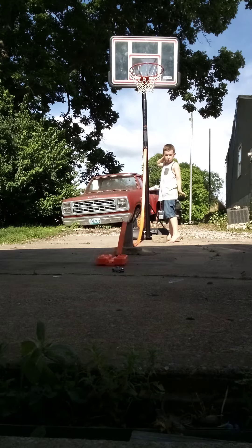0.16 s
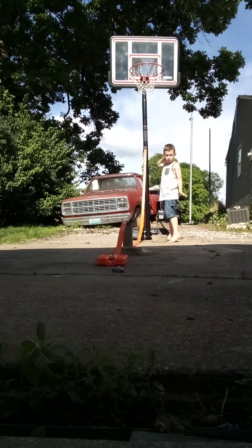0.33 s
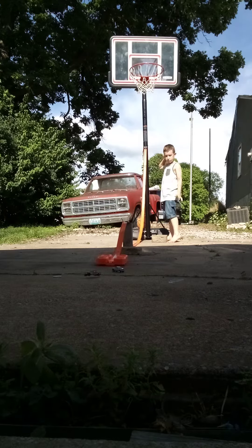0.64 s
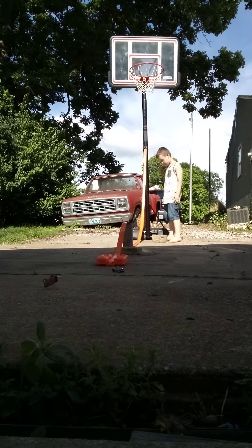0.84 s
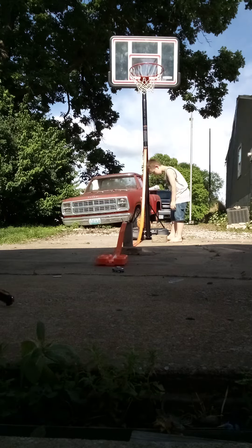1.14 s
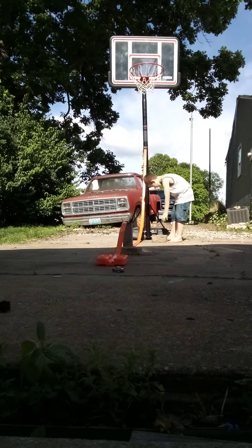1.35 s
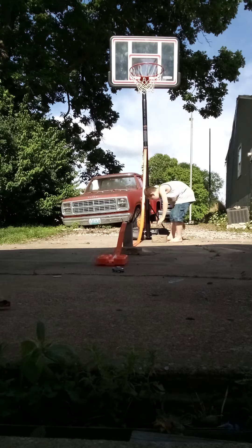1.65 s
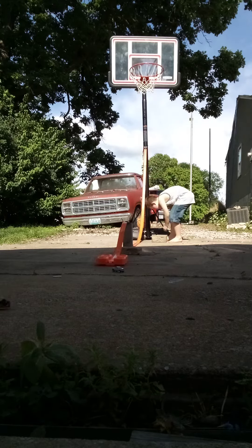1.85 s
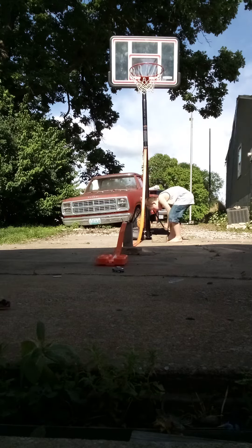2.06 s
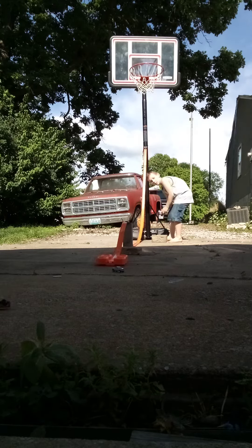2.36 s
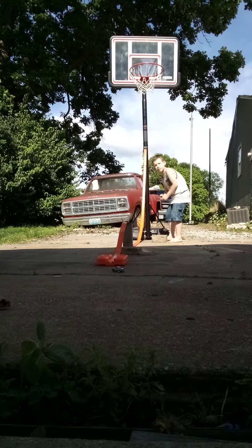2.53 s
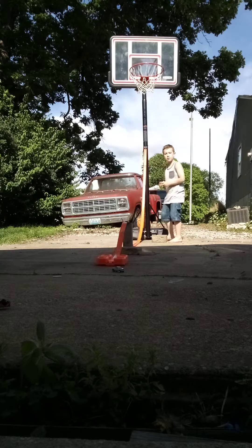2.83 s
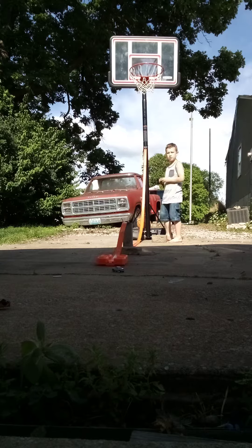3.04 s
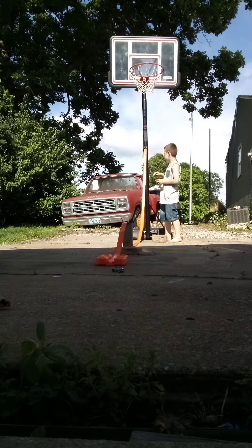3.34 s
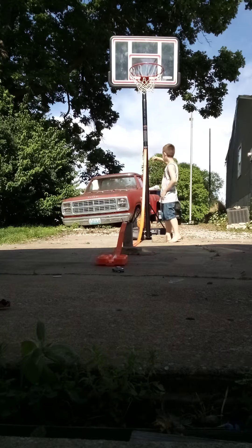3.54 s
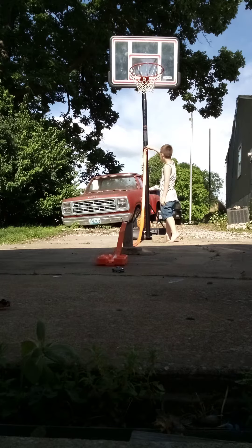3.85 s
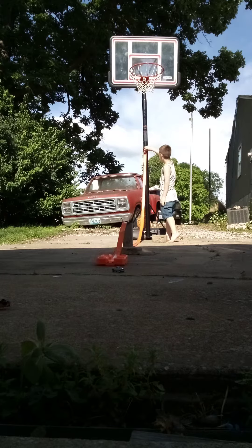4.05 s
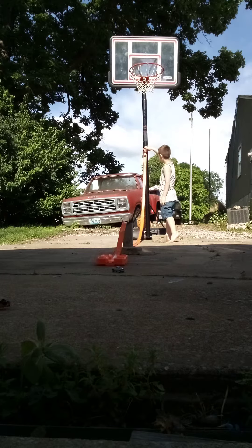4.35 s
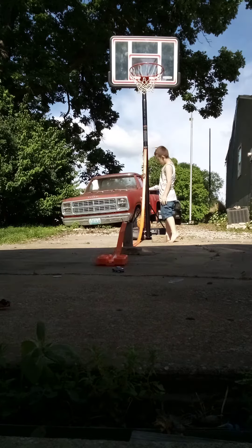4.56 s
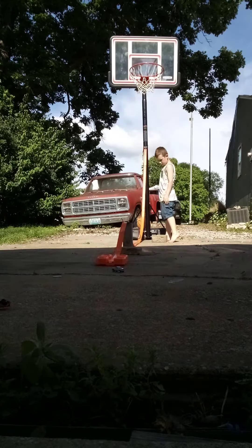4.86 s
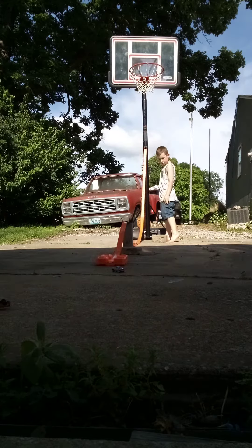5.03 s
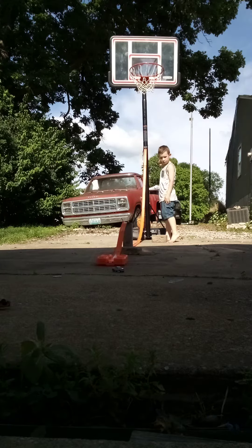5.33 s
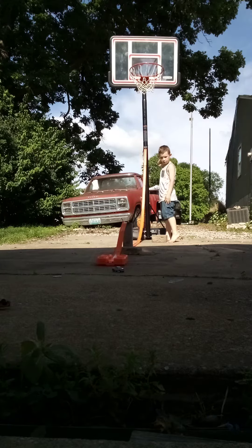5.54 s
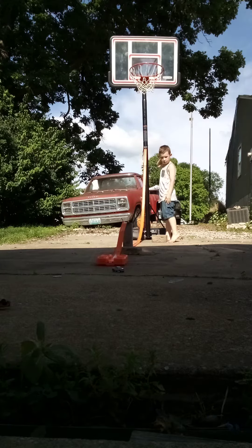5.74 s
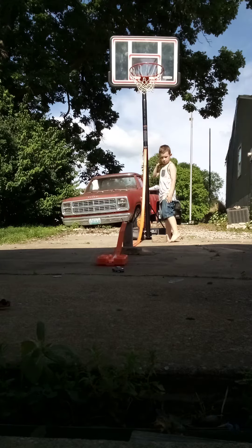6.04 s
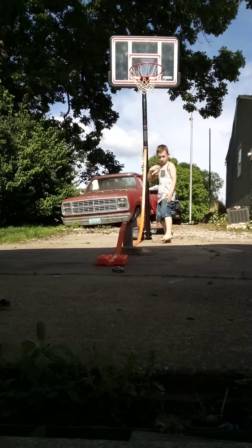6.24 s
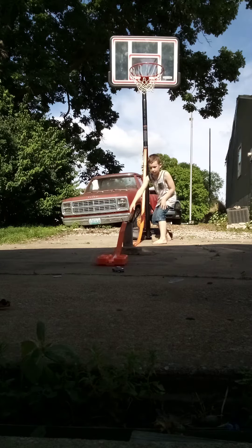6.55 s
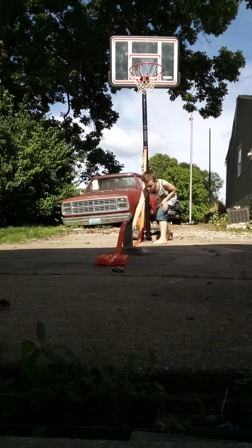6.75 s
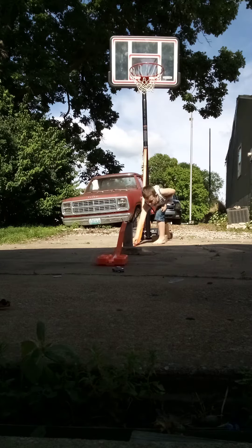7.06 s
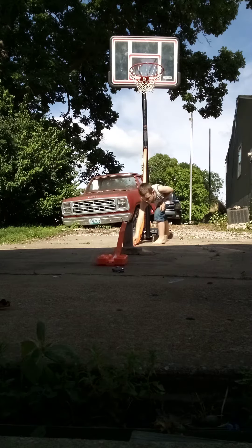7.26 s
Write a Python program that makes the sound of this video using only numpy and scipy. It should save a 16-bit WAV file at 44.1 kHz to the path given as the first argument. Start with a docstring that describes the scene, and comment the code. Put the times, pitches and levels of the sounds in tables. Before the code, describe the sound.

A small metal toy car rattles down a plastic track right at the start, its tiny wheels chattering with a hollow knock or two. From about 0.5 seconds it tumbles over concrete in quick, bright, slightly ringing clicks, loudest close to the microphone between 0.8 and 1.4 seconds, and settles by 1.9 seconds. Behind it a motor vehicle hums with an uneven exhaust beat, rising in pitch and shifting up just after 2 seconds. Its low drone grows, is strongest from about 4.5 to 6 seconds, and eases toward the end, a little after 7 seconds. From 4.5 to 5.5 seconds feet scuff over grit and kick small clicking stones, with another faint scuff near 6.3 seconds. Soft distant tyre noise and leaf hiss continue throughout. House walls give the near sounds short, light echoes in the open yard.

```python
"""A small metal toy car rattles down a plastic track, then tumbles over concrete near the microphone.
Its wheels chatter and each knock rings the die-cast shell. A vehicle with an uneven exhaust beat
pulls away, shifts up and drones past; tyre roar and leaves rush behind. Later, soles scuff on grit
and kick stones. House walls give the near sounds short echoes."""
import sys
import numpy as np
from scipy import signal
from scipy.fft import rfft, irfft
from scipy.io import wavfile
from scipy.ndimage import uniform_filter1d, map_coordinates

SR = 44100
rng = np.random.default_rng(int(sys.argv[2]) if len(sys.argv) > 2 else 0)


def transcribe(signal):
    """Save signal, clipped to [-1, 1], as a 16-bit WAV file at the path in sys.argv[1]."""
    frames = np.atleast_2d(signal).T
    limited = np.clip(frames, -1, 1)
    pcm = np.round(limited * 32767).astype(np.int16)
    wavfile.write(sys.argv[1], SR, pcm)


N = 325943
TIME_S = np.arange(N) / SR


def amp(db):
    """Gain of a level in dB."""
    return 10 ** (np.asarray(db) / 20)


def unit(x):
    """x at rms 1."""
    return x / np.sqrt(np.mean(x ** 2) + 1e-20)


def curves(rows):
    """One value per sample for each column after the time."""
    times_s, *columns = np.transpose(rows)
    return [np.interp(TIME_S, times_s, column) for column in columns]


def wobble(rate_hz):
    """Smooth random curve through rate_hz knots a second."""
    return map_coordinates(rng.standard_normal(int(N * rate_hz / SR) + 4), [TIME_S * rate_hz])


def coloured(x, spectrum):
    """x through a minimum-phase filter given as (Hz, dB) points."""
    points_hz, points_db = np.transpose(spectrum)
    bins_hz = np.fft.rfftfreq(16384, 1 / SR)
    gain = amp(np.interp(np.log(bins_hz + 1), np.log(points_hz), points_db))
    cepstrum = irfft(np.log(gain + 1e-7))
    cepstrum[1:8192] *= 2  # fold onto the causal half
    cepstrum[8193:] = 0
    return signal.fftconvolve(x, irfft(np.exp(rfft(cepstrum))))[:len(x)]


def rush(spectrum, patchy_db=2.5, drift_db=0, tick_gain=0):
    """Coloured noise of rms 1 with quick patches and slow drifts of gain, plus optional dense ticks."""
    stft = signal.stft(rng.standard_normal(N), nperseg=512)[2]

    def gain_field(bins, frames):
        across_bins = uniform_filter1d(rng.standard_normal(stft.shape), bins, axis=0)
        return unit(uniform_filter1d(across_bins, frames, axis=1))

    gain_db = drift_db * gain_field(4, 50) + patchy_db * gain_field(3, 8)
    noise = signal.istft(stft * amp(gain_db), nperseg=512)[1][:N]
    ticks = (rng.random(N) < 400 / SR) * rng.uniform(-1, 1, N)
    return unit(coloured(unit(noise) + tick_gain * unit(ticks), spectrum))


# Each row: frequency in Hz, gain in dB.
MIC_RESPONSE = [(500, -0.5), (4000, -4), (4800, -8.5), (5500, -37), (6500, -27), (8000, -41.5),
                (12000, -93.5)]

def microphone(x):
    """A small microphone dulls the treble."""
    return coloured(x, MIC_RESPONSE)


def rattle(per_s, centre_hz, octaves, t60_cycles):
    """Scattered tiny contacts, each ringing briefly at its own pitch."""
    t = np.arange(SR // 100) / SR
    when, pitch, strength = rng.random((round(per_s * N / SR), 3)).T[:, :, None]
    hz = centre_hz * 2 ** (octaves * (pitch - 0.5))
    envelope = amp(-60 * t * hz / t60_cycles) * (1 - np.exp(-t * hz))
    pings = -np.log(strength + 1e-3) * envelope * np.sin(2 * np.pi * hz * t)
    at = (when * N).astype(int) + np.arange(len(t))
    return microphone(unit(np.bincount(at.ravel(), pings.ravel(), N)[:N]))


# Each row: centre in seconds, exhaust order, depth in dB, seconds from centre to half depth.
ORDER_DIPS = [(0.318, 5, 19, 0.026), (0.503, 5, 8, 0.051), (0.82, 5, 16, 0.061), (2.308, 8, 17, 0.03),
              (2.48, 8, 22, 0.065), (2.737, 8, 25, 0.053), (2.92, 8, 15, 0.044), (4.716, 5, 8.5, 0.078),
              (4.843, 8, 10.5, 0.086), (4.978, 8, 5, 0.044), (5.2, 8, 24, 0.029), (5.311, 8, 11, 0.028),
              (5.348, 5, 9, 0.094), (5.676, 5, 6, 0.051), (5.684, 8, 29, 0.039), (5.863, 8, 4.5, 0.042),
              (5.955, 5, 11, 0.057), (6.061, 8, 17, 0.033), (6.208, 8, 9, 0.047), (6.255, 5, 10, 0.056),
              (6.526, 5, 10.5, 0.053), (6.63, 8, 23, 0.043), (7.01, 5, 2, 0.08), (7.075, 8, 5, 0.06),
              (7.237, 5, 17, 0.024)]

def dip_gain(order):
    """One exhaust order dips briefly in level."""
    return amp(-sum(depth_db * np.clip(1 - abs(TIME_S - centre_s) / (2 * half_s), 0, 1)
                    for centre_s, dipped, depth_db, half_s in ORDER_DIPS if dipped == order))


# Upshift just after 2 s. Each row: time in seconds, engine cycle rate in Hz.
ENGINE_SPEED = [(0.0, 19.2), (0.2, 20.0), (0.37, 20.9), (0.57, 21.6), (1.01, 22.3), (1.23, 23.3),
                (2.07, 25.5), (2.24, 22.0), (2.39, 21.5), (2.6, 21.3), (3.2, 21.4), (4.0, 22.2),
                (4.63, 22.4), (5.35, 23.2), (6.15, 23.1), (6.34, 22.5), (7.39, 22.4)]
# Nearness of the vehicle. Each row: time in seconds, exhaust noise level in dB.
NEARNESS = [(0.0, -58.5), (0.4, -53), (1.2, -50.5), (1.7, -52), (2.5, -46.5), (2.9, -45), (3.75, -43.5),
            (4.7, -39.5), (5.3, -43), (5.8, -43), (6.35, -42), (7.0, -42.5), (7.39, -49.5)]
# Each row: time in seconds, levels of orders 4, 5, 8 and 13 in dB.
STRONG_ORDERS = [(0.0, -67, -42, -56, -64), (0.45, -55.5, -48.5, -62.5, -83), (0.9, -51.5, -44, -55.5, -69),
                 (1.3, -45.5, -40.5, -53, -67), (1.65, -53, -43, -55.5, -66.5),
                 (2.0, -55, -49, -52.5, -67.5), (2.25, -51.5, -38, -52.5, -58.5),
                 (2.6, -59, -35.5, -47.5, -51.5), (3.0, -61, -38, -55.5, -56),
                 (3.4, -62, -37.5, -46, -51.5), (4.0, -55.5, -36.5, -37, -56),
                 (4.45, -65.5, -31.5, -33, -56), (4.75, -58.5, -35.5, -37, -45),
                 (5.1, -56.5, -31, -42, -47.5), (5.5, -56.5, -29.5, -37.5, -65),
                 (5.8, -45.5, -29, -36, -60), (6.1, -52, -31.5, -36.5, -62), (6.4, -54, -36.5, -43, -58),
                 (6.9, -59.5, -38, -41.5, -63), (7.39, -64, -38.5, -42.5, -74)]
# Each row: order, relative level in dB.
WEAK_ORDERS = [(2, -9), (3, -9), (6, -7), (7, -10), (9, -4), (10, -5), (11, -11), (12, -12), (14, -11),
               (16, -10), (18, -9), (19, -12), (20, -10)]
# Each row: frequency in Hz, relative level in dB.
EXHAUST_NOISE_SPECTRUM = [(40, -51), (70, -19), (100, 0.5), (160, -2.5), (250, -5), (330, -8), (420, -18.5),
                          (600, -78)]

def engine():
    """Uneven firing puts tones on multiples of the cycle rate; a few boom in the pipe."""
    (cycle_hz,), (near_db,) = curves(ENGINE_SPEED), curves(NEARNESS)
    fourth_db, fifth_db, eighth_db, thirteenth_db = curves(STRONG_ORDERS)
    phase = 2 * np.pi * np.cumsum(cycle_hz) / SR
    tones = amp(fifth_db + wobble(7)) * dip_gain(5) * np.sin(5 * phase + 0.15 * wobble(12))
    tones += amp(eighth_db + 1.5 * wobble(7)) * dip_gain(8) * np.sin(8 * phase + 0.2 * wobble(12))
    tones += amp(fourth_db) * np.sin(4 * phase + 0.3 * wobble(8))
    tones += amp(thirteenth_db) * np.sin(13 * phase + 1.1 * wobble(12))
    approach_db = near_db + 45
    low_db, high_db = -55.5 + 0.83 * approach_db, -58 + 2.2 * approach_db
    for order, relative_db in WEAK_ORDERS:  # street reflections fade each on its own
        level_db = (low_db if order <= 10 else high_db) + relative_db + 2.5 * wobble(2.5)
        tones += amp(level_db) * np.sin(order * phase + 0.65 * wobble(12) + rng.uniform(0, 2 * np.pi))
    return np.sqrt(2) * tones + amp(near_db) * rush(EXHAUST_NOISE_SPECTRUM)


# Each row: time in seconds, levels of rumble, tyre roar, leaf hiss and body drone in dB.
STREET_LEVELS = [(0.0, -55, -54.5, -60.5, -73), (0.4, -69, -51.5, -76, -64), (0.85, -57, -55, -55.5, -64),
                 (1.25, -57, -53.5, -60.5, -64.5), (1.6, -57.5, -50.5, -59, -74.5),
                 (1.9, -58.5, -54.5, -58, -78), (2.3, -56, -54, -64, -71), (2.7, -60.5, -54, -64.5, -65),
                 (3.3, -66, -53.5, -59.5, -66), (3.8, -64, -53.5, -57, -57),
                 (4.8, -58.5, -48.5, -54.5, -51), (5.15, -50.5, -51.5, -55.5, -53),
                 (5.55, -43.5, -48.5, -57, -58), (6.1, -55, -49.5, -55, -50),
                 (6.6, -65.5, -48.5, -53.5, -56), (7.15, -59.5, -48.5, -59.5, -61.5),
                 (7.24, -48.5, -49, -60.5, -58.5)]
# Each row: frequency in Hz, relative level in dB.
TYRE_SPECTRUM = [(300, -39.5), (450, -11.5), (620, -1), (800, 4.5), (1000, -0.5), (1300, -4), (1800, -12.5),
                 (2200, -28), (2900, -43.5), (4800, -120)]
LEAF_SPECTRUM = [(760, -26), (1300, -4), (1390, -9.5), (1930, -8), (2370, -8), (2760, -8), (3480, -13.5),
                 (3810, -18.5), (4310, -30.5), (5600, -50.5), (7280, -94.5), (12300, -120)]

def street():
    """Low rumble, far tyre roar, leaf hiss and a body drone that grows as the vehicle nears."""
    rumble_db, tyre_db, leaf_db, drone_db = curves(STREET_LEVELS)
    rumble = rush([(20, -1), (30, -2.5), (42, -5.5), (65, 19), (90, 1), (140, -70.5)], patchy_db=0.5)
    drone = rush([(250, -46.5), (360, 8), (450, 5), (600, 4), (800, -55)])
    tyres = rush(TYRE_SPECTRUM, patchy_db=1.6)
    leaves = rush(LEAF_SPECTRUM, drift_db=1.4)
    return amp(rumble_db) * rumble + amp(drone_db) * drone + amp(tyre_db) * tyres + amp(leaf_db) * leaves


# Each row: frequency in Hz, level in dB, t60 in seconds.
SHELL_MODES = [(1700, -20.5, .045), (2340, -7.5, 0.044), (2900, -12.5, 0.06), (3236, 6.5, 0.044),
               (3280, -10.5, 0.2), (3860, -13.5, .035), (4300, -13, .035)]

def shell_ring(t, bright_hz):
    """The die-cast shell rings; a blow favours the modes nearest its brightest pitch."""
    ring = np.zeros(len(t))
    for hz, mode_db, t60_s in SHELL_MODES:
        level_db = mode_db + rng.normal(0, 2.5) - 34 * abs(np.log2(hz / bright_hz))
        ring += amp(level_db - 60 * t / t60_s) * np.sin(2 * np.pi * hz * t)
    return ring


# Crack, skid on concrete and top edge of a hard contact. Each row: frequency in Hz, gain in dB.
CRACK_SPECTRUM = [(590, -56.5), (1000, -31.5), (1430, -19.5), (2160, -14.5), (2700, -7.5), (3230, -2.5),
                  (3540, -14), (3820, -1), (4490, -9.5), (5400, -32), (7020, -61.5), (11900, -120)]
SKID_SPECTRUM = [(500, -43), (1000, -25.5), (1600, -21.5), (2300, -6.5), (3200, -3), (4200, -10),
                 (5000, -20), (5600, -39), (6500, -34.5), (8000, -68.5), (12000, -120)]
EDGE_SPECTRUM = [(4000, -52), (5200, -2.5), (6000, 5), (6600, 5), (7300, -5.5), (8000, -22), (10000, -65)]

def impacts(rows):
    """Each contact gives a blow, ring, thud, crack, skid and top edge; long contacts are soft."""
    tones, cracks, skids, edges = np.zeros((4, N + SR))
    t = np.arange(SR // 8) / SR
    next_starts_s = [row[0] for row in rows[1:]] + [N / SR]
    for row, next_s in zip(rows, next_starts_s):
        start_s, level_db, bright_hz, ring_db, thud_db, contact_ms, crack_db, skid_db, edge_db = row
        contact_s = contact_ms / 1000
        onset = amp(level_db) * (1 - np.exp(-(1.87 * t / contact_s) ** 2))
        pulse = amp(level_db) * np.exp(-((t - contact_s) / (0.48 * contact_s)) ** 2)
        blow = pulse * np.sin(2 * np.pi * bright_hz * t)
        damping = amp(-60 * np.maximum(start_s + t - next_s, 0) / 0.015)  # by the next contact
        ring = amp(ring_db) * shell_ring(t, bright_hz) * damping
        thud_hz = 1290 / np.sqrt(contact_ms)
        thud = 1.1 * amp(thud_db - 60 * t / 0.011) * np.sin(2 * np.pi * thud_hz * t)
        noise = rng.standard_normal((3, len(t)))
        cutoff_hz = 5000 * 2 ** ((edge_db + 45) / 27.5)  # harder edge, brighter crack and skid
        crack_noise, skid_noise = signal.lfilter(*signal.butter(3, cutoff_hz, fs=SR), noise[:2])
        at = round(start_s * SR) + np.arange(len(t))
        tones[at] += blow + onset * (ring + thud)
        cracks[at] += onset * amp(crack_db - 60 * t / (9 * contact_s)) * crack_noise
        skids[at] += onset * amp(skid_db - 60 * t / 0.066) * skid_noise
        edges[at] += onset * amp(edge_db - 60 * t / (0.005 + 5 * contact_s)) * noise[2]
    gritty_skids = skids[:N] * amp(3.75 * wobble(300))
    return (microphone(tones[:N])
            + amp(13) * coloured(cracks[:N], CRACK_SPECTRUM)
            + amp(13.5) * coloured(gritty_skids, SKID_SPECTRUM)
            + amp(15.5) * coloured(edges[:N], EDGE_SPECTRUM))


# Each row: start in seconds, level in dB, brightest pitch in Hz, ring and thud in relative dB,
# contact time in ms, crack, skid and top edge in relative dB.
CAR_KNOCKS = [(0.0908, -44, 3030, -14, -9, 3, 11.5, -14, -33),
              (0.126, -46, 2860, -14, -14, 1.3, 1, -18, -34),
              (0.165, -42, 3330, -15, -13, 1.6, 1, -15, -26.5), (0.172, -33, 3400, -14, -9, 1, -5, -9, -34),
              (0.2372, -33, 2780, -17, -22, 1.3, -8, -19, -30.5),
              (0.3155, -38, 2630, -10, 3, 1.9, 3, -19, -54),
              (0.342, -26.5, 3370, -12, -5, 0.98, -7, -9.5, -44),
              (0.377, -26, 2550, -12, -17, 4.3, -16, -16, -58),
              (0.4024, -29, 2550, -12, -10, 1.6, -5, -18, -48),
              (0.4607, -36, 2700, -11, -16, 3, -10, -8, -48),
              (0.5405, -19.5, 4610, -19, -28, 1.7, -5, -11.5, -30.5),
              (0.549, -27, 3280, -8, -25, 2.7, -12, -25, -38),
              (0.5649, -33, 3300, -17, -19, 0.66, 2, -11, -33),
              (0.5845, -29.5, 3080, -5.5, -31, 2.4, 2, -13, -35),
              (0.634, -29, 3340, -13, -29, 2.3, -3, -7, -29.5),
              (0.681, -42.5, 3300, -17, -21, 1.9, 7, -9, -30),
              (0.684, -26, 3440, -14, -23, 1.8, -9, -9, -39), (0.692, -29, 3100, -9, -22, 1.6, 3, -15, -38),
              (0.6988, -35.5, 3400, -10, -15, 1.9, -6, 0.5, -31),
              (0.7593, -22.5, 3280, -12.5, -3, 2.15, 3, -23, -38.5),
              (0.7915, -29, 3330, -12.5, -36, 2.7, 1.5, -13, -34.5),
              (0.8526, -16, 3225, -27, -23, 2.2, -4, -25, -34),
              (0.8914, -31, 3180, -10, -18, 2.8, -15, 0.5, -25),
              (0.9855, -12.5, 3060, -1.5, -14, 1.26, -8.5, -21, -37.5),
              (1.04, -24.5, 3500, -20.5, -10, 1.7, 4.5, -12.5, -34.5),
              (1.046, -29.5, 3280, -16.5, -14, 1.2, 1, -9, -37.5),
              (1.0775, -23, 3170, -26.5, -34, 2.6, 2.5, -17.5, -35),
              (1.0835, -31, 3160, -21, -21.5, 2, -8, -13.5, -40),
              (1.1844, -15.5, 3170, -7, -32, 1.4, 0.5, -23, -39),
              (1.1972, -12.5, 3180, -30, -9.5, 1.48, -2.5, -19, -42),
              (1.281, -17.5, 3070, -14, -32, 2, -14, -16, -52.5),
              (1.3185, -27, 3160, -25, -19, 1.7, -10, -12, -42),
              (1.3417, -26.5, 2850, -5, -2.5, 1.5, -4, -5.5, -37),
              (1.351, -24.5, 2740, -19, -13, 1.3, -7, -16.5, -45),
              (1.372, -16, 3200, -10.5, -28.5, 2, 1.5, -26.5, -42.5),
              (1.3844, -33, 3250, -15, -14.5, 1.2, -3.5, -11, -38.5),
              (1.4157, -23, 3150, -8.5, -21.5, 4.4, -5, -5.5, -47),
              (1.4304, -28.5, 3150, -24, 3, 2.8, -4, -7, -51.5),
              (1.4674, -39.5, 3160, -14, -5, 3, 4.5, -2.5, -40),
              (1.577, -35.5, 3180, -10.5, -8, 2.1, -4, -21, -57),
              (1.5905, -40, 3150, -6, -9, 2.1, 2, -4, -58), (1.6017, -37.5, 2850, -15, -8, 2, -2, -11, -60),
              (1.7035, -36, 3250, -14.5, -28, 2, 0, -10, -41),
              (1.7161, -31, 3560, -19, -7, 1.7, -13, -12, -40),
              (1.737, -42, 2361, -11, -3, 1.2, 0, -14, -42),
              (1.845, -56, 4000, -24, -10.5, 3.7, 5, -3, -38)]

def car_knocks():
    """The toy car strikes the track, then the concrete."""
    return impacts(CAR_KNOCKS)


# Each row: start in seconds, end in seconds, level in dB, slope in dB per second.
WHEEL_RUNS = [(0.106, 0.345, -46.5, -6), (0.333, 0.458, -39.5, -16.5), (0.46, 0.54, -46, -79.5)]
# Each row: frequency in Hz, relative level in dB.
WHEEL_SPECTRUM = [(590, -24), (1000, -20), (1140, -19), (1280, -1), (1390, -16), (1680, -4), (2190, -2.5),
                  (2510, 0), (3350, 2.5), (3950, -8.5), (5200, -22), (5800, -31), (6600, -35), (7980, -77),
                  (10400, -96.5), (17600, -120)]
# Each row: frequency in Hz, bandwidth in Hz, relative level in dB.
TRACK_MODES = [(860, 100, -3), (1665, 57, 1), (1776, 76, 2), (2050, 34, -8.5), (2570, 120, 1),
               (2750, 43, -1), (3280, 98, -8), (3780, 53, 0)]

def wheels(ramp_s=0.013):
    """Tiny wheels chatter along the track and jolt its hollow resonances."""
    envelope = np.zeros(N)
    for start_s, end_s, level_db, db_per_s in WHEEL_RUNS:
        age_s = TIME_S - start_s
        gate = np.clip(np.minimum(age_s, end_s + ramp_s - TIME_S) / ramp_s, 0, 1)
        envelope += gate * amp(level_db + db_per_s * np.clip(age_s, 0, end_s - start_s))
    jolts = rush([(300, 6), (3900, -4), (5500, -32), (9000, -78)], tick_gain=0.78)
    hollow = sum(amp(db) * unit(signal.lfilter(*signal.iirpeak(hz, hz / width_hz, SR), jolts))
                 for hz, width_hz, db in TRACK_MODES)
    flutter = amp(-4.5 + 2.3 * wobble(109.7))
    rolling = rush(WHEEL_SPECTRUM, tick_gain=0.57) + amp(-3) * unit(hollow)
    chatter = amp(-6) * rattle(per_s=450, centre_hz=2800, octaves=1.1, t60_cycles=30)
    return envelope * (flutter * rolling + chatter)


# Each row: start in seconds, level in dB, pitch in Hz.
HOLLOW_THUMPS = [(.316, -26.5, 880), (.49, -40, 432), (.759, -48, 820), (.893, -48, 394),
                 (1.342, -39.5, 480)]

def thumps(rise_s=0.0038, t60_cycles=31):
    """A soft push from the car rings a hollow in the track or ground."""
    out, t = np.zeros(N + SR), np.arange(SR // 8) / SR
    for start_s, level_db, hz in HOLLOW_THUMPS:
        envelope = amp(level_db - 60 * t * hz / t60_cycles) * (1 - np.exp(-t / rise_s))
        out[round(start_s * SR):][:len(t)] += envelope * np.sin(2 * np.pi * hz * t)
    return out[:N]


# Each row: start in seconds, level in dB, rise in seconds, t60 in seconds.
SOLE_DRAGS = [(4.5, -59, 0.2, 0.61), (4.695, -55, .055, 1.1), (4.838, -56, 0.0076, 0.61),
              (4.955, -62, .012, 1.5), (5.15, -64, 0.15, 1.05), (5.38, -63.5, 0.11, 0.12),
              (6.2, -63.5, 0.039, 0.79), (6.302, -63, 0.0068, 0.23)]
# Each row: frequency in Hz, relative level in dB.
GRIT_SPECTRUM = [(900, -35.5), (1500, 0), (2200, 4.5), (2800, 9.5), (3700, 2), (4700, -20.5), (5400, -30.5),
                 (6200, -29.5), (7000, -53), (8000, -70.5), (12000, -120)]

def scuffs():
    """Soles drag over grit and rattle small pebbles."""
    envelope = np.zeros(N)
    for start_s, level_db, rise_s, t60_s in SOLE_DRAGS:
        age_s = TIME_S - start_s
        decay_db = 60 * np.maximum(age_s - rise_s, 0) / t60_s
        envelope += np.clip(age_s / rise_s, 0, 1) * amp(level_db - decay_db)
    pebbles = amp(-2) * rattle(per_s=900, centre_hz=3300, octaves=1.4, t60_cycles=20)
    grit = amp(4.5 + 2.7 * wobble(67)) * rush(GRIT_SPECTRUM, patchy_db=2, tick_gain=0.44)
    return envelope * (pebbles + grit)


# Each row: start in seconds, level in dB, brightest pitch in Hz, top edge in relative dB.
STONE_HITS = [(4.6968, -32.5, 3080, -62), (4.735, -37, 2820, -51), (4.7489, -32.5, 2880, -48),
              (4.7742, -37, 2470, -53), (4.816, -40, 3400, -44), (4.842, -38, 3800, -40),
              (4.8475, -40, 3040, -40), (4.877, -36.5, 2960, -43), (4.9031, -31, 3380, -42),
              (4.9649, -33.5, 3280, -43), (4.996, -38, 3400, -54), (5.0175, -36, 3530, -38.5),
              (5.25, -47, 2920, -41), (5.3303, -47, 4300, -50), (5.366, -42.5, 2600, -43),
              (5.4575, -43.5, 2830, -53), (6.328, -48.5, 2950, -43)]

def stones(ring_db=-np.inf, thud_db=-7.5, contact_ms=1.4, crack_db=-5, skid_db=-11.5):
    """Stones kicked by the soles click without ringing."""
    return impacts([(start_s, level_db, hz, ring_db, thud_db, contact_ms, crack_db, skid_db, edge_db)
                    for start_s, level_db, hz, edge_db in STONE_HITS])


# Each row: delay in seconds, level in dB.
WALL_ECHOES = [(0.0106, -22), (.026, -23), (.035, -27)]

def yard(x, t60_s=0.22):
    """House walls add a few echoes and a short scattered tail; both lose treble."""
    t = np.arange(SR // 4) / SR
    tail_envelope = amp(-11 - 60 * t / t60_s) * (t > 0.004)
    response = tail_envelope * rng.standard_normal(len(t)) / np.sqrt(0.0064 * SR)
    for delay_s, level_db in WALL_ECHOES:
        response[round(delay_s * SR)] += amp(level_db)
    response = coloured(response, [(1000, -3.5), (3600, -4.5), (5000, -5), (7000, -7.5)])
    return x + signal.fftconvolve(x, response)[:N]


def scene():
    """All sources in mono; only the near ones echo."""
    near = car_knocks() + wheels() + thumps() + scuffs() + stones()
    return (yard(near) + engine() + street())[None]


def record(dry, top_hz=8100):
    """Brick-wall low-pass at top_hz."""
    mirrored = np.concatenate([dry, dry[:, ::-1]], axis=1)
    passband = np.fft.rfftfreq(2 * N, 1 / SR) < top_hz
    return irfft(rfft(mirrored) * passband, 2 * N)[:, :N]


dry = scene()
out = record(dry)
transcribe(out)
```